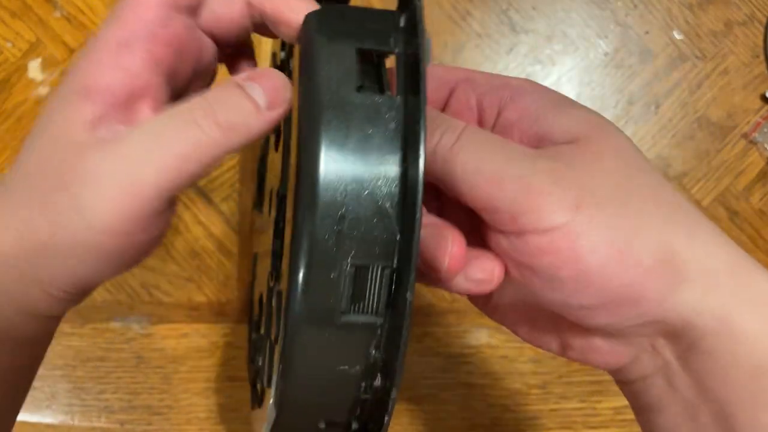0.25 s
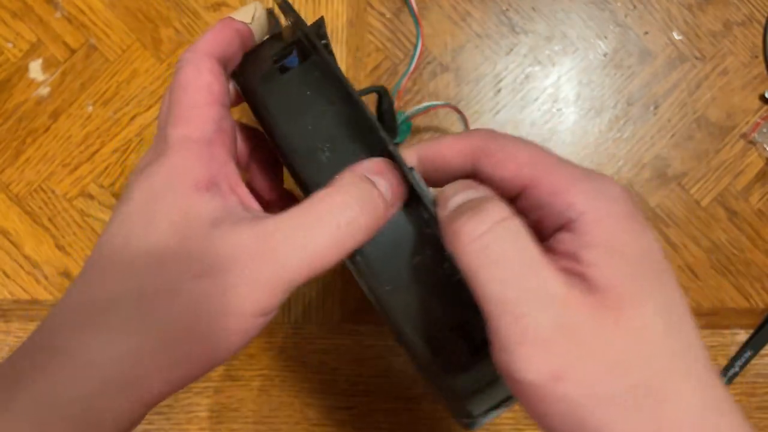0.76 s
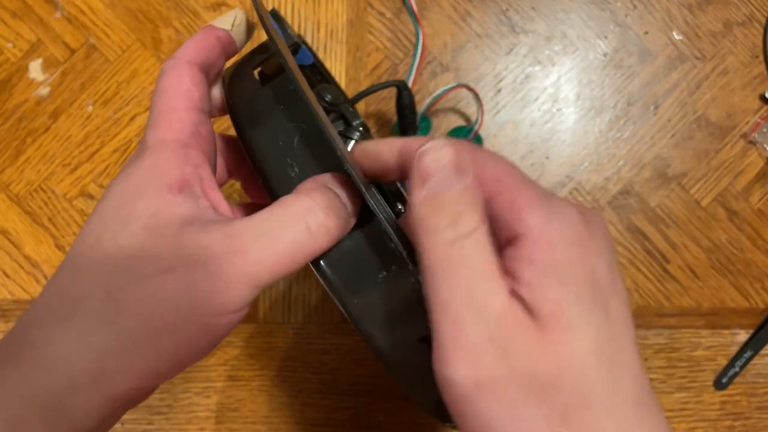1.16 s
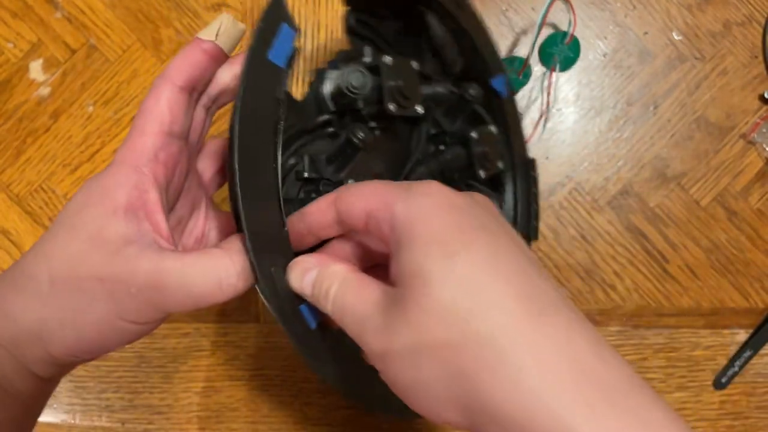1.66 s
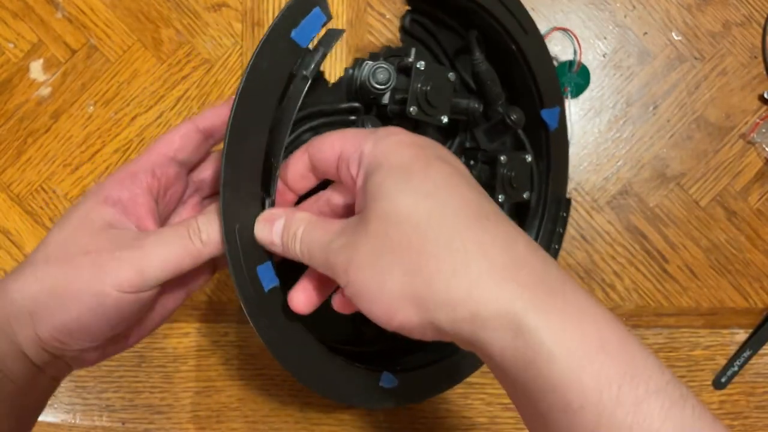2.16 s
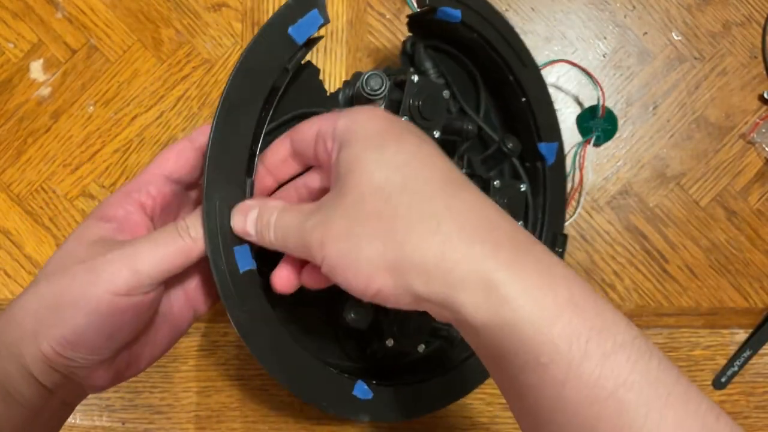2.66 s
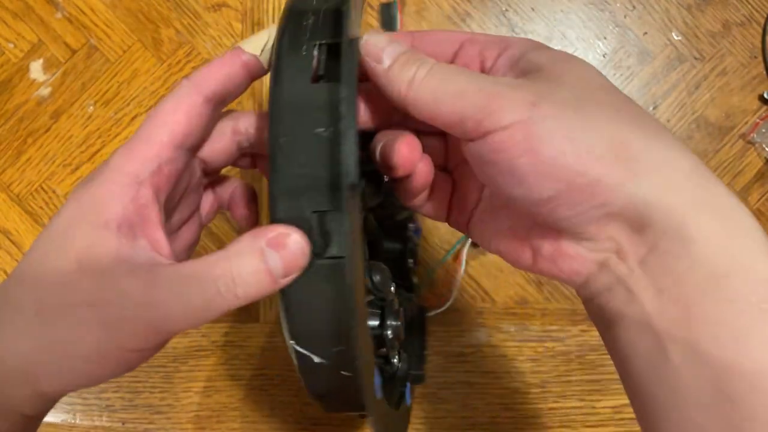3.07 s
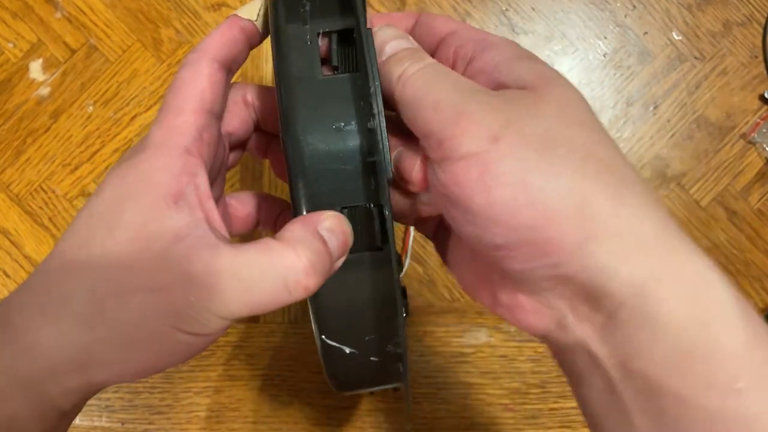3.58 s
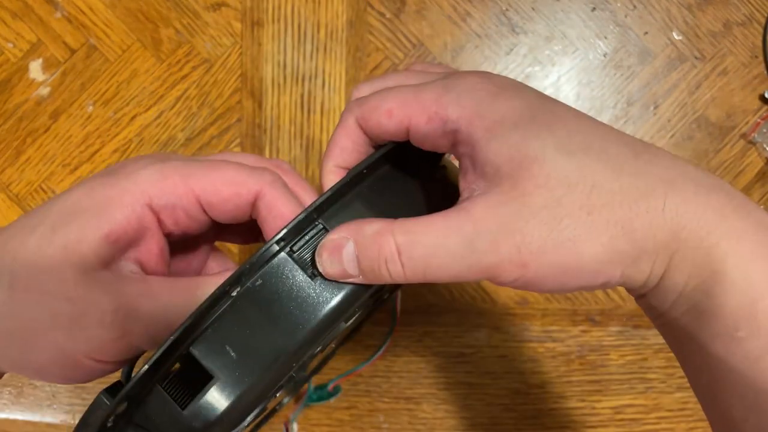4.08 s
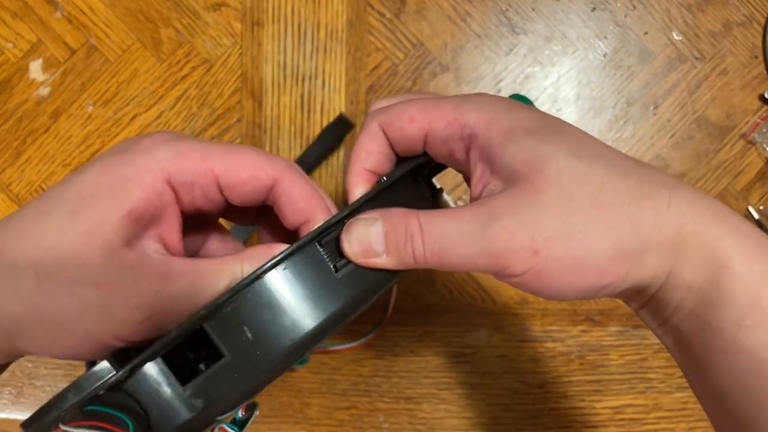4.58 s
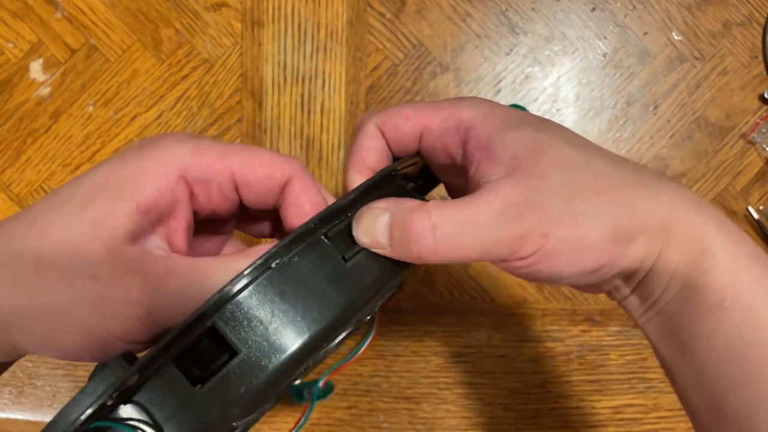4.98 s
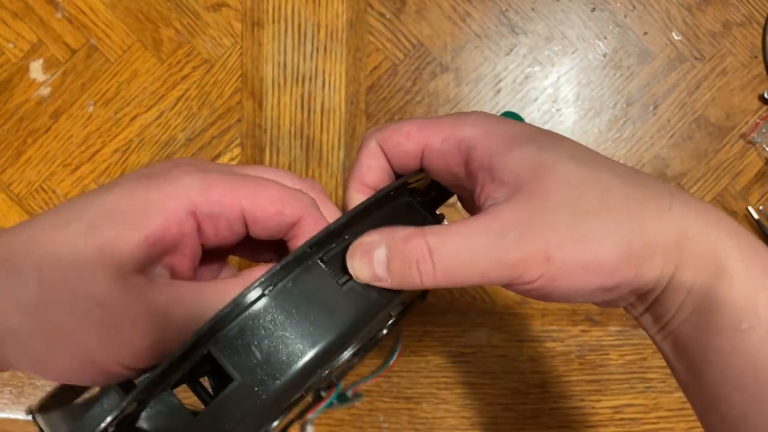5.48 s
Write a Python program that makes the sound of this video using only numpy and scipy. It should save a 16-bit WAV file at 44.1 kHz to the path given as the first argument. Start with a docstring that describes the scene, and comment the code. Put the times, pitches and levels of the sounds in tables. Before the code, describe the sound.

Very close stereo sound of hands working a hollow, hard-plastic housing in a small, quiet room with short reflections and faint air noise. Soft dry scraping starts at once, with small clicks around 0.4-0.5 s, then scattered ticks near 0.8-1.05 s. Brighter clicks and a tiny judder come at 1.3-1.4 s. At 1.65 s a sharp snap lands with a hollow, low ringing knock. After a lull, the hardest, brightest click cracks at 2.4 s, followed by dull bumps. A knock at 2.76 s leads into quick clicks and a hoarse, stuttering rim drag until about 3.2 s. From 3.3 to 4.3 s it is quieter: light rubs, faint ticks, soft low thumps of regripping. A scrape and judder at 4.4-4.5 s precede a strong snap at 4.6 s; a catch then pops every tenth of a second or so, each with a quick rebound. Clicks cluster at 5.45 s, then a last snap and scrape near 5.65 s.

```python
"""Two hands turn and pry a round hard-plastic housing over a wooden table in a small room.
Stick-slip scrapes and hoarse drags open the scene; rims click as damped noise bursts with a ringing tone.
Ringing modes knock under a snap at 1.65 s; the hardest click falls at 2.4 s, then rims drag and judder.
From 4.6 s a pried catch jumps from notch to notch, with clustered clicks near 5.45 s and a last scrape.
Faint shifting of the hands, shaped-noise reflections and quiet air lie under it all, at two close ports."""
import sys
import numpy as np
from scipy import signal
from scipy.fft import rfft, irfft, next_fast_len
from scipy.io import wavfile
from scipy.ndimage import uniform_filter1d, map_coordinates

SR = 44100
rng = np.random.default_rng(int(sys.argv[2]) if len(sys.argv) > 2 else 0)


def output_pcm(signal):
    """Save a mono or channel-first signal as 16-bit PCM at the path in sys.argv[1].

    Samples are clipped to [-1, 1] before scaling.
    """
    pcm = np.clip(np.atleast_2d(signal).T, -1, 1) * 32767
    wavfile.write(sys.argv[1], SR, np.round(pcm).astype(np.int16))


N = 253134

# likeness of direct sound at the two ports: pitch_hz, likeness [0-1]
PORT_LIKENESS = [(140, 0.83), (450, 0.78), (650, 0.62), (2400, 0.55), (5000, 0.49), (7000, 0.99)]
# phase by which the left port leads: pitch_hz, lead_rad
LEFT_LEAD = [(200, 0), (1250, 0.31), (1500, 3), (2000, 0.85), (3500, 1), (7500, 1.4), (11000, 7)]

# a click creaks this long before its snap
CREAK_S = 0.015
# the rim rings near one pitch; RIM_SHARE is the ring's share of crack-and-ring power before adjustments
RIM_HZ, RIM_SCATTER_OCTAVES, RIM_SHARE = 2368, 0.069, 0.23


def amp(db):
    """Decibels to gain."""
    return 10 ** (np.asarray(db) / 20)


def unit(x):
    """Scales to rms 1."""
    return x / np.sqrt(np.mean(x ** 2) + 1e-20)


def read(points, hz):
    """Reads a table on a log-frequency axis."""
    f, value = np.transpose(points)
    return np.interp(np.log(hz + 1), np.log(f), value)


def add(mix, s, sound):
    """Adds a sound to the channels of a mix at time s."""
    part = mix[:, max(round(s * SR), 0):][:, :sound.shape[1]]
    part += sound[:, :part.shape[1]]


def band(hz, lo_hz, hi_hz):
    """Gain of a steep band-pass."""
    return 1 / np.sqrt((1 + (lo_hz / (hz + 1)) ** 10) * (1 + (hz / hi_hz) ** 10))


def causal(gain):
    """Gives a gain curve the phase of a thing that rings only after it is struck."""
    log_gain = np.log(np.maximum(gain, 1e-5))
    both_sides = np.r_[log_gain, log_gain[-2:0:-1]]
    return np.exp(np.conj(signal.hilbert(both_sides)))[:len(gain)]


def ports(pair, likeness=PORT_LIKENESS, lead=LEFT_LEAD):
    """Spectra at the two ports from two unrelated signals: how alike, which is louder and which leads."""
    # pitch_hz, left_minus_right_db
    balance = [(200, 0.5), (1200, -1.5), (2400, 1.5), (4200, 3), (6800, -4), (11000, 1.5)]
    hz = np.fft.rfftfreq(pair.shape[1], 1 / SR)
    a, b = rfft(pair)
    same = np.clip(read(likeness, hz), 0, 1)
    lean = amp(read(balance, hz) / 2)
    mid = a * np.sqrt((1 + same) / 2)
    side = b * np.sqrt((1 - same) / 2)
    left = (mid + side) * lean
    right = (mid - side) / lean * np.exp(-1j * read(lead, hz))
    return hz, np.array([left, right])


def tone(hz, t):
    """One steady mode as the two ports hear it, the left leading in phase."""
    phase = rng.uniform(0, 2 * np.pi) - read(LEFT_LEAD, hz) * np.arange(2)[:, None]
    return np.sin(2 * np.pi * hz * t + phase)


def wall_modes(hz, moments, per_octave=7, count=96):
    """Random peaks and dips over frequency: which wall modes the contact point excites as it moves on."""
    grid = rng.standard_normal((count, int(np.max(moments)) + 2))
    places = np.meshgrid(per_octave * np.log2(1 + hz / 200), moments, indexing="ij")
    return map_coordinates(grid, places, order=3, mode="mirror")


def pressure_db(place):
    """A hand presses hardest in the middle of a stroke (place 0-1)."""
    edge_drop_db = 4.5
    return -edge_drop_db * (2 * place - 1) ** 2


def click(db, body_db, treble_db, ring_hz, share, rise_s=0.0002, decay_s=0.0021, ring_s=0.0026,
          creak_db=-23, creak_s=0.0076, after_db=-17, after_s=0.017, chatter_db=4, wall_db=3, size=4096):
    """A contact creaks, lets go with a burst of damped wall modes and a ring, then chatters to rest."""
    # colour of a click: pitch_hz, level_db [per Hz]
    click_colour = [(200, -22), (600, -3), (1100, 6.5), (1500, 1.5), (2400, 8), (3300, 6), (4400, -3),
                    (5600, -13), (6700, -1.5), (7600, -8), (8500, -9), (10000, -11.5), (12800, -23.5),
                    (15000, -20)]
    t = np.arange(size) / SR - CREAK_S
    before, after = np.maximum(-t, 0), np.maximum(t, 0)
    attack = 1 - np.exp(-after / rise_s)

    flutter = unit(uniform_filter1d(rng.standard_normal(size), size=60))
    chatter = unit(amp(chatter_db * flutter))
    creak = amp(creak_db) * np.exp(-before / creak_s) * (t < 0)
    rest = attack * amp(after_db) * np.exp(-after / after_s)
    shape = attack * np.exp(-after / decay_s) + chatter * (creak + rest)

    hz, burst = ports(rng.choice([-1., 1.], (2, size)) * shape)
    colour = amp(read(click_colour, hz) + wall_db * wall_modes(hz, [0])[:, 0])

    def layer(lo_hz, hi_hz):
        return unit(irfft(burst * causal(colour * band(hz, lo_hz, hi_hz))))

    body, crack, treble = layer(350, 1577), layer(1300, 5550), layer(5200, 9220)
    ring = attack * np.exp(-after / ring_s) * tone(ring_hz, t)
    share = np.clip(share, 0, 1)
    sound = np.sqrt(1 - share) * crack + np.sqrt(share) * unit(ring)
    sound += amp(body_db) * body + amp(treble_db) * treble
    return amp(db) * sound * np.sqrt(0.005 * SR / size)  # the level refers to 5 ms


def ping(db):
    """The lowest mode of the side wall, rung by a hard snap."""
    ping_hz, t60_s = 1055, 0.075
    t = np.arange(0, 2 * t60_s, 1 / SR)
    return amp(db - 60 * t / t60_s) * (1 - np.exp(-t * ping_hz)) * tone(ping_hz, t)


def rims():
    """Edges click against each other; light contacts can ring the rim, hard ones make the wall ping."""
    # sharp clicks: start_s, level_db, body_db [re level], treble_db [re level]
    contacts = [(0.39, -50.5, -1, 7), (0.454, -40.5, -10, -2), (0.479, -40.5, 1, 1.5),
                (0.493, -33, -11, -3), (0.7884, -37.5, -25, -10), (0.9059, -34.5, 0.5, 6),
                (1.049, -32.5, -5, -2), (1.3287, -29.5, -26, -1), (1.363, -35, -27, -4),
                (1.375, -37, -20, -2.5), (1.6519, -23, 0.5, -3), (1.916, -56, 14, 7.5),
                (2.1861, -45, -1.5, 5), (2.3992, -15.5, -17.5, -0.5), (2.5818, -45, -1, -7.5),
                (2.729, -54, -3, 3), (2.7591, -36, 5, -17), (2.806, -40.5, -25, -3),
                (2.8543, -31.5, -19, -11), (2.861, -30, -20, -5.5), (2.8733, -40, -25, 7),
                (2.9269, -31.5, -28, -14), (3.063, -33, -33, -13), (3.587, -43.5, -13, 2.5),
                (3.773, -50.5, 2, -8), (3.992, -44, 3, -19), (4.03, -53, -8, 5), (4.076, -48, 1, 6.5),
                (4.256, -57, 4, 1), (4.319, -53, 1, -0.5), (4.381, -36.5, -3.5, -1.5),
                (4.851, -40, -7, -18), (5.329, -50.5, 6.5, 8), (5.356, -47.5, 1, 3),
                (5.4329, -37.5, 1.5, 0), (5.4396, -30, -20, -1), (5.4466, -30.5, -1.5, 6.5),
                (5.461, -31, 3, 3.5), (5.4874, -32.5, 2.5, 3), (5.5137, -36.5, -25, 4),
                (5.657, -41, -0.5, 6), (5.6714, -31.5, -15, 2.5)]
    hard_db = -30.5  # above this level a click counts as hard
    share_per_treble_db, share_per_force_db = 0.15, 5  # ring share lost per dB
    light_wall_db, ping_db = 4.5, -7  # peaks and dips of a light click; ping re click
    out = np.zeros((2, N))
    for s, db, body_db, treble_db in contacts:
        force_db = max(db - hard_db, 0)
        ring_hz = RIM_HZ * 2 ** (RIM_SCATTER_OCTAVES * rng.standard_normal())
        share = RIM_SHARE - share_per_treble_db * treble_db - share_per_force_db * force_db
        wall_db = light_wall_db * amp(-force_db)  # hard contacts crack more evenly
        add(out, s - CREAK_S, click(db, body_db, treble_db, ring_hz, share, wall_db=wall_db))
        if force_db > 0:
            add(out, s, ping(db + ping_db))
    return out


def catch():
    """The pried catch jumps a notch and rebounds; the wall rings on, with another mode mix at each notch."""
    # jumps: start_s, level_db, body_db [re level], treble_db [re level], rebound_after_s
    jumps = [(4.6102, -23.5, -15, -8, 0.009), (4.7533, -40.5, -13, -12.5, 0.013),
             (4.8592, -32, -9.5, -10.5, 0.016), (4.9842, -32, -24, -6, 0.015),
             (5.064, -26, -22.5, -6, 0.012), (5.1902, -34, -17, -10, 0.015), (5.279, -40, -19, -19, 0.013),
             (5.6156, -27, -14, -2.5, 0.0072)]
    # modes of the wall that holds the catch: pitch_hz, mean_level_db [re the jump]
    holding_wall = [(1626, -14), (1906, -25), (2568, -26), (3262, -23)]
    wall_t60_s, wall_scatter_db = 0.14, 3.5
    tab_hz, tab_scatter_octaves, tab_share = 3250, 0.06, 0.23  # the tab rings near one pitch
    rebound_db = -5.5  # re the jump
    out = np.zeros((2, N))
    t = np.arange(SR // 2) / SR
    for s, db, body_db, treble_db, rebound_s in jumps:
        for delay, drop_db in ((0, 0), (rebound_s, rebound_db)):
            ring_hz = tab_hz * 2 ** (tab_scatter_octaves * rng.standard_normal())
            add(out, s + delay - CREAK_S, click(db + drop_db, body_db, treble_db, ring_hz, tab_share))
        for hz, mode_db in holding_wall:
            start_db = db + rng.normal(mode_db, wall_scatter_db)
            add(out, s, amp(start_db - 60 * t / wall_t60_s) * tone(hz, t))
    return out


def judders():
    """A rim catches and slips many times in a row; the slips tend to be strongest mid-run."""
    # runs of tiny clicks: start_s, end_s, level_db, treble_db [re level], rate [slips per s]
    runs = [(1.292, 1.327, -39, -7.5, 149), (1.383, 1.432, -39, -3, 320), (2.89, 3.19, -39.5, -6, 130),
            (4.424, 4.5, -39, -10.5, 280), (5.291, 5.431, -53, 2.5, 65)]
    body_db, scatter_db = -17, 2  # body re each slip; level scatter of the slips
    out = np.zeros((2, N))
    for start, end, db, treble_db, slips_per_s in runs:
        count = round((end - start) * slips_per_s)
        places = (np.arange(count) + rng.random(count)) / count
        for place, (force, pitch) in zip(places, rng.standard_normal((count, 2))):
            slip_db = db + pressure_db(place) + scatter_db * force
            ring_hz = RIM_HZ * 2 ** (RIM_SCATTER_OCTAVES * pitch)
            slip = click(slip_db, body_db, treble_db, ring_hz, RIM_SHARE / 2)
            add(out, start + place * (end - start) - CREAK_S, slip)
    return out


def knock(db, centre_hz, ring, spread=0.64, thud_db=-7, thud_s=0.011, size=32768):
    """A soft blow rings the shell modes near its centre, over a short thud of the parts inside."""
    # modes of the shell: pitch_hz, level_db, t60_s [before the ring-time factor]
    shell_modes = [(100.6, -17, 0.23), (151.5, 8, 0.097), (171.8, -7.5, 0.74), (197.7, 2.5, 0.27),
                   (252, -15, 0.2), (282.7, 3, 0.19), (360.6, 3.5, 0.15), (402.2, -1.5, 0.29),
                   (444, 3.5, 0.13), (528, 2.5, 0.073), (820, 4, 0.065), (929, 6, 0.17), (1040, 5.5, 0.09),
                   (1190, 2.5, 0.11)]
    t = np.arange(size) / SR
    mode_hz, mode_db, t60 = np.transpose(shell_modes)[:, :, None]

    def reach(hz):
        return 1 / (1 + (np.log2((hz + 1) / centre_hz) / spread) ** 2)

    # the blow starts the modes loosely in step, and each mode nearly alike at both ports
    count = len(shell_modes)
    phase = rng.normal(0, 1.0, (count, 1)) + rng.normal(0, 0.12, (2, count, 1))
    decay = amp(mode_db - 60 * t / (t60 * max(ring, .1)))
    modes = (reach(mode_hz) * decay * np.sin(2 * np.pi * mode_hz * t + phase)).sum(1)

    hz, thud = ports(rng.standard_normal((2, size)) * np.exp(-t / thud_s))
    thud = irfft(thud * causal(reach(hz) * band(hz, 108, 750)))
    attack = 1 - np.exp(-(t * centre_hz / 0.54) ** 2)  # lower-centred blows start more slowly
    radiation = signal.butter(4, 81, "highpass", fs=SR)  # a small shell gives off no deep bass
    sound = signal.lfilter(*radiation, attack * (unit(modes) + amp(thud_db) * unit(thud)))
    return amp(db) * unit(sound) * np.sqrt(0.014 / t[-1])  # the level refers to 14 ms


def shell():
    """The shell bumps against the table and the hands: low modes under a short clack of stiff upper modes."""
    # dull knocks: start_s, level_db, centre_hz, ring_time [factor, low when gripped], clack_db [re level]
    bumps = [(0.79, -44.5, 147, 0.79, -19), (0.906, -42.5, 360, 0.73, -11), (1.056, -40.5, 144, 0.34, -7),
             (1.651, -18, 350, 0.73, -13.5), (1.652, -19, 195, 0.85, -17), (2.359, -37.5, 258, 0.86, -10.5),
             (2.403, -35.5, 189, 0.7, -12), (2.477, -40, 316, 0.87, -7.5), (2.513, -47, 350, 0.53, -4),
             (2.543, -36, 276, 0.82, -13), (2.7604, -27.5, 378, 0.37, -9.5), (3.993, -42, 300, 0.3, -11),
             (4.148, -49, 290, 0.74, -15), (4.225, -53.5, 255, 0.94, -19), (5.449, -35, 440, 0.33, -14)]
    clack_hz, clack_ring = 940, 0.16  # centre, and ring time as a factor
    out = np.zeros((2, N))
    for s, db, centre_hz, ring, clack_db in bumps:
        add(out, s, knock(db, centre_hz, ring))
        add(out, s, knock(db + clack_db, clack_hz, clack_ring, spread=0.26, size=8192))
    return out


def effort(part):
    """Gain over time of one scraping part (0 rumble, 1 scrape, 2 hiss): strokes over the holding hands."""
    # strokes: start_s, length_s, scrape_db, rumble_db [re scrape], hiss_db [re scrape]
    strokes = [(0.061, 0.2, -49, -19, -4.5), (0.12, 0.15, -46.5, -24, -9.5),
               (0.765, 0.034, -43.5, -4.5, -12), (1.044, .14, -45.5, -1.5, -11.5),
               (1.237, 0.3, -48, -14, -12.5), (1.272, 0.079, -51, 8.5, -4),
               (1.399, 0.037, -41.5, -26, -1.5), (1.657, 0.1, -45.5, -6, -13),
               (2.145, 0.2, -57, 5.5, -11.5), (2.459, 0.1, -47, -6, -12.5),
               (2.708, 0.13, -47.5, 6.5, -11.5), (2.848, 0.13, -42.5, -4, -7.5),
               (2.99, 0.21, -42.5, -7.5, -6.5), (3.142, 0.14, -59, 9, -16), (3.345, 0.056, -49, -1, -6.5),
               (3.601, 0.21, -52.5, -3.5, -44), (3.891, 0.025, -51.5, -2, -4),
               (3.987, 0.076, -57, 4.5, -10), (4.297, 0.01, -50, -6, 0), (4.375, 0.12, -40, -9, -7.5),
               (4.528, 0.031, -40.5, -10.5, -11.5), (4.6, 1, -56.5, -15, -17.5),
               (5.438, 0.026, -40, -4.5, -9.5), (5.477, 0.12, -52.5, -8, -2),
               (5.643, 0.18, -48.5, 0.5, 2.5)]
    # constant small shifting of the hands: rumble_db, scrape_db, hiss_db
    holding = (-62.5, -62.5, -73)
    grip_share, let_go_s = 0.12, 0.018  # share of the length spent gripping; decay of the contact
    power = np.full(N, amp(holding[part]) ** 2)
    for start, length, db, rumble_db, hiss_db in strokes:
        t = np.arange(0, length + 6 * let_go_s, 1 / SR)
        press = amp(pressure_db(np.minimum(t / length, 1)))
        grip = np.minimum(t / (grip_share * length), 1)
        release = np.exp(-np.maximum(t - length, 0) / let_go_s)
        part_db = db + (rumble_db, 0, hiss_db)[part]
        stroke = amp(part_db) * press * grip * release
        add(power[None], start, stroke[None] ** 2)
    return np.sqrt(power)


def scrape(slips_per_s=800, slip_spread_db=4.0, smooth_db=-7, clump_db=2, wall_db=4.5,
           rumble_db=-1, scrape_db=-1, hiss_db=0):
    """Skin and rims stick and slip over the plastic: tiny ticks in a smoother hiss, coloured by the walls."""
    # colour of a scrape: pitch_hz, level_db [per Hz]
    rub_colour = [(50, -1), (130, 9), (350, 9.5), (620, -2.5), (1000, 2), (1500, 5), (2500, 3.5),
                  (4300, -10.5), (5600, -18.5), (6800, -7), (8500, -11.5), (10300, -19), (12800, -45),
                  (15000, -36)]
    slip_s = 0.0012  # decay of the power of one slip
    stick_db = -63  # scrape level around which smooth sliding turns to stick and slip

    # many tiny slips of uneven size, which come in clumps
    sizes = amp(slip_spread_db * np.minimum(rng.exponential(1, N), 4)) * (rng.random(N) < slips_per_s / SR)
    pressure = signal.lfilter([1], [1, -np.exp(-1 / (slip_s * SR))], sizes ** 2)
    clumps = unit(uniform_filter1d(rng.standard_normal(N), size=350))
    pressure = pressure * amp(clump_db * clumps) ** 2
    sticking = 1 / (1 + (amp(stick_db) / effort(1)) ** 2)
    grain = np.sqrt(sticking * pressure / pressure.mean() + 1 - sticking + amp(smooth_db) ** 2)

    ticks = rng.standard_normal((2, N)) * grain
    ticks = np.pad(ticks, ((0, 0), (0, next_fast_len(N) - N)))
    stereo = irfft(ports(ticks)[1])[:, :N]
    hz, times, z = signal.stft(stereo, SR, nperseg=512, noverlap=384)
    # the sliding contact finds other wall modes about twelve times a second
    walls = wall_modes(hz, 12 * times)
    z = z * amp(read(rub_colour, hz)[:, None] + wall_db * walls)

    def layer(lo_hz, hi_hz):
        spectrum = z * band(hz, lo_hz, hi_hz)[:, None]
        return unit(signal.istft(spectrum, nperseg=512, noverlap=384)[1][:, :N])

    rumble = layer(73.6, 840) * amp(rumble_db) * effort(0)
    rub = layer(584, 5450) * amp(scrape_db) * effort(1)
    hiss = layer(4760, 45000) * amp(hiss_db) * effort(2)
    return rumble + rub + hiss


def drag(start, end, db, ring_hz, sharpness, overtone=2.65, overtone_db=-12, grip_db=3.0):
    """Friction keeps one bending mode of the rim and its overtone ringing for the length of a stroke."""
    size = 2 * max(round((end - start) * SR / 2), 64)
    # the grip wavers over several milliseconds
    grip = unit(uniform_filter1d(rng.standard_normal(size), size=400, mode="wrap"))
    hz, noise = ports(rng.standard_normal((2, size)) * amp(grip_db * grip))

    def peak(centre_hz):
        return 1 / (1 + (2 * sharpness * (hz - centre_hz) / ring_hz) ** 2)

    resonance = peak(ring_hz) + amp(overtone_db) * peak(overtone * ring_hz)
    sound = unit(irfft(noise * band(hz, ring_hz / 2, SR) * resonance))
    return amp(db) * sound * signal.windows.tukey(size, .5)


def drags():
    """A rim or fingertip dragged over a wall sings hoarsely or groans at a friction-driven resonance."""
    # start_s, end_s, level_db, resonance_hz, sharpness [Q]
    pulls = [(0.218, 0.269, -50.5, 1047, 11), (0.615, 0.793, -58.5, 770, 4.6),
             (2.616, 2.726, -57, 915, 2.5), (2.716, 2.767, -35.5, 275, 14), (2.805, 2.872, -39, 340, 1.5),
             (2.87, 3.19, -42.5, 2490, 8.9), (4.443, 4.586, -46.5, 886, 6.7)]
    out = np.zeros((2, N))
    for row in pulls:
        add(out, row[0], drag(*row))
    return out


def thumps(push_s=0.0062):
    """A hand taking a new grip pushes the whole housing: a few soft, low swings."""
    # start_s, level_db, pitch_hz
    pushes = [(3.996, -40.5, 88), (4.055, -44, 107.5), (4.316, -44.5, 101.1)]
    out = np.zeros((2, N))
    t = np.arange(SR // 2) / SR
    for s, db, hz in pushes:
        swell = t / push_s * np.exp(1 - t / push_s)
        add(out, s, (amp(db) * swell * np.sin(2 * np.pi * hz * t))[None])
    return out


def room(x, first_s=0.0049, build_s=0.002, size=22050):
    """Quick reflections from table and housing, then from the walls, each band dying at its own speed."""
    # wall reflections: pitch_hz, t60_s
    room_t60 = [(150, 0.91), (2500, 0.14), (14000, 0.5)]
    # wall reflections: pitch_hz, level_db
    room_level = [(150, -9.5), (450, -12.5), (2200, -6.5), (7000, -16), (14000, -29.5)]
    # early reflections: pitch_hz, level_db
    early_level = [(300, 0), (1200, -0.5), (3100, -5), (7000, -25)]
    early_t60_s = 0.06
    # likeness of the reflections at the two ports: pitch_hz, likeness [0-1]
    room_likeness = [(150, 0.96), (3000, 0.1), (7000, 1)]
    t = np.arange(size) / SR
    sparse = rng.standard_normal((2, size)) * (rng.random((2, size)) < .15)
    taps = irfft(ports(sparse, room_likeness, lead=[(1, 0)])[1])
    hz, times, z = signal.stft(unit(taps), SR, nperseg=256)

    def decay(level, t60):
        fall = amp(read(level, hz)[:, None] - 60 * times / t60)
        return fall * np.sqrt(2 * np.log(1000) / (t60 * SR))  # scales the tail's energy to its level

    late_t60 = np.maximum(read(room_t60, hz), .1)[:, None]
    z = z * np.hypot(decay(early_level, early_t60_s), decay(room_level, late_t60))
    tail = signal.istft(z, SR, nperseg=256)[1][:, :size]
    tail = tail * (1 - np.exp(-np.maximum(t - first_s, 0) / build_s))
    return signal.fftconvolve(x, tail, axes=1)[:, :N]


def air():
    """Steady faint noise of the room: random noise with a fixed colour."""
    # pitch_hz, level_db [per Hz, relative]
    air_colour = [(20, -7.5), (60, 4), (400, -9), (2300, -19), (5000, -45.5), (7000, -16.5), (13000, -61.5)]
    air_db = -63.5
    hz, noise = ports(rng.standard_normal((2, next_fast_len(N))))
    return amp(air_db) * unit(irfft(noise * amp(read(air_colour, hz)))[:, :N])


def scene():
    """Clicks, knocks and scraping of the housing, in the room."""
    housing = scrape() + rims() + judders() + catch() + shell() + thumps() + drags()
    return housing + room(housing) + air()


def record(dry):
    """The microphone drops the deepest bass; then a band limit takes off the highest treble."""
    lowest_hz, cutoff_hz = 38, 16000
    dry = signal.sosfilt(signal.butter(2, lowest_hz, "highpass", fs=SR, output="sos"), dry)
    low_pass = signal.firwin(511, cutoff_hz, window=("kaiser", 9), fs=SR)
    return signal.oaconvolve(dry, low_pass[None], "same")


dry = scene()
out = record(dry)
output_pcm(out)
```